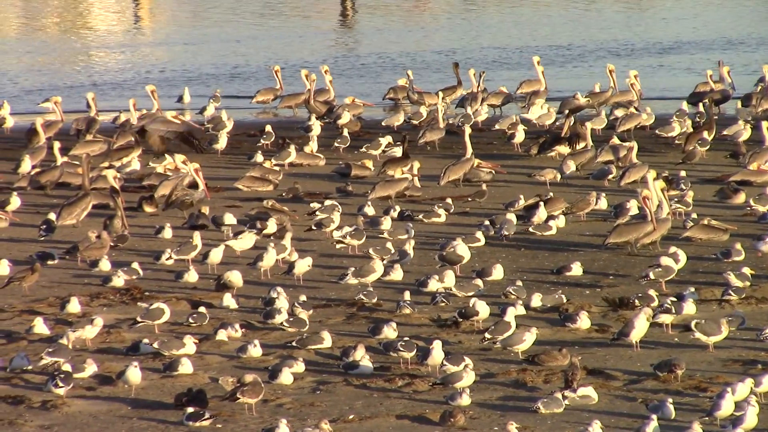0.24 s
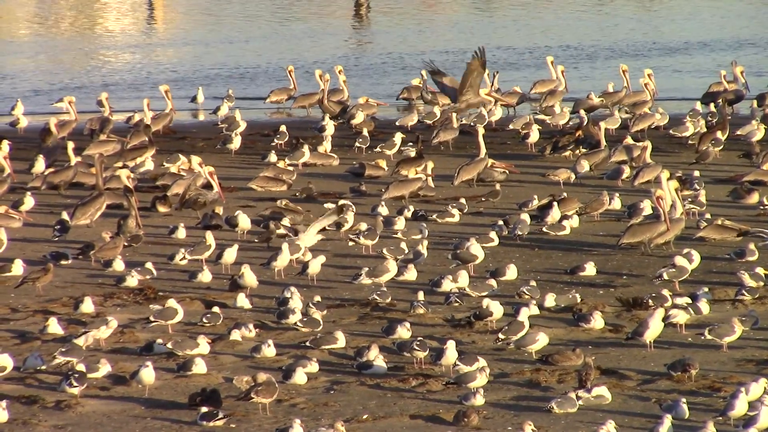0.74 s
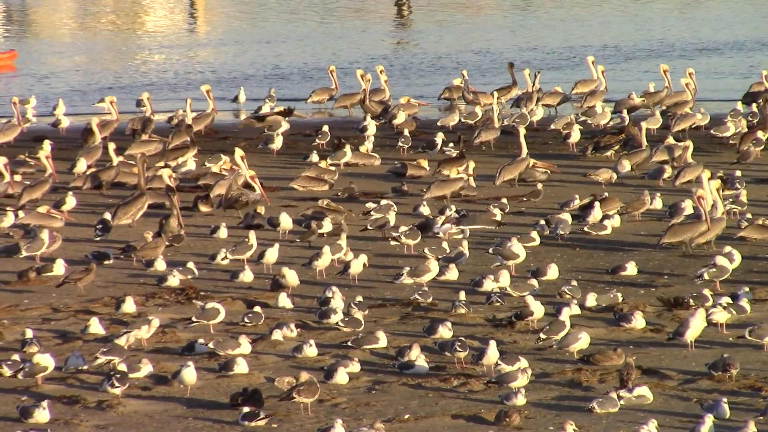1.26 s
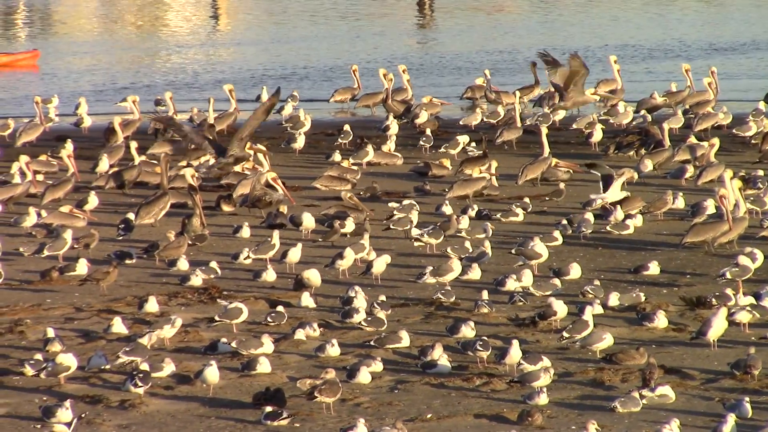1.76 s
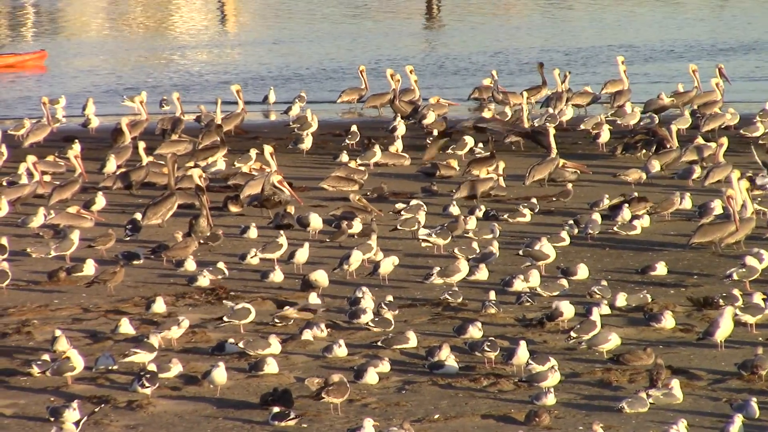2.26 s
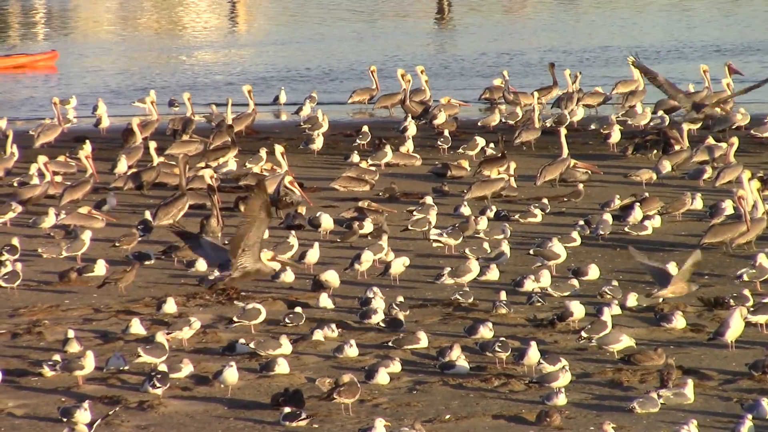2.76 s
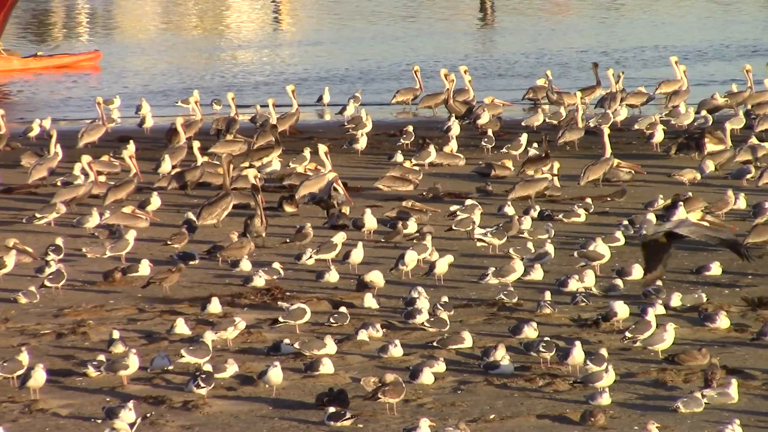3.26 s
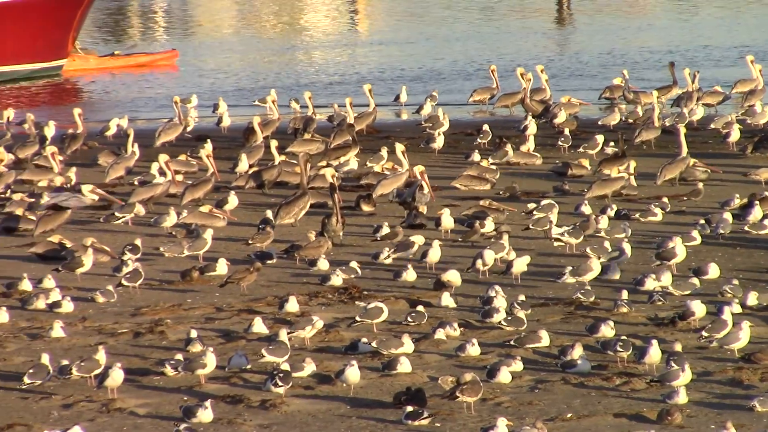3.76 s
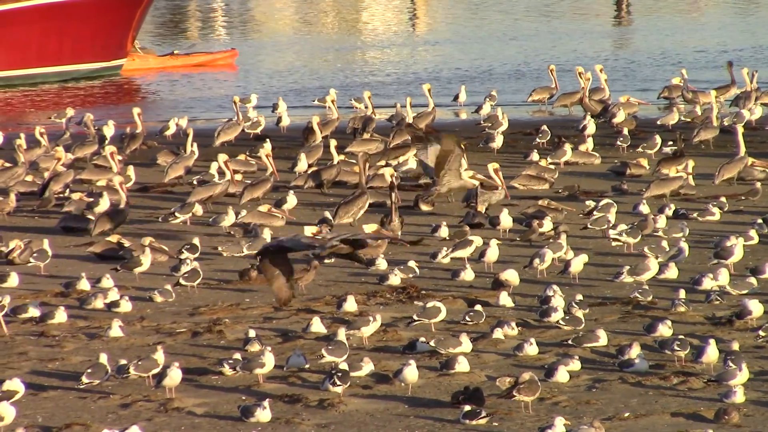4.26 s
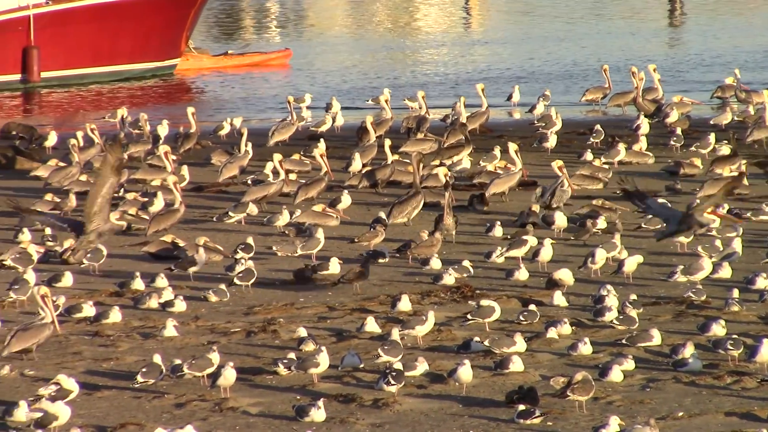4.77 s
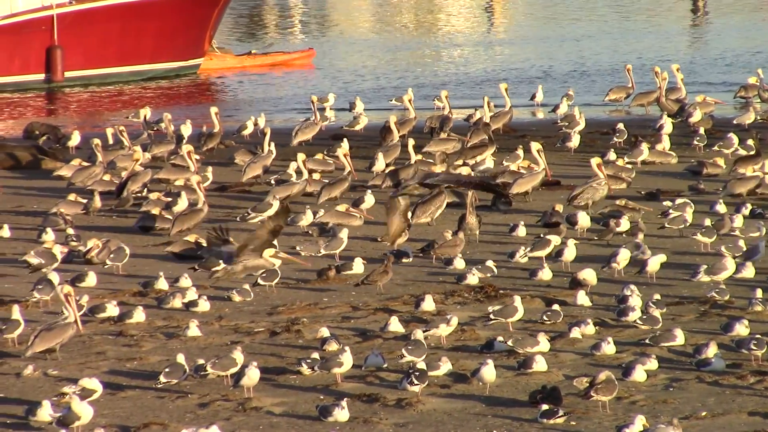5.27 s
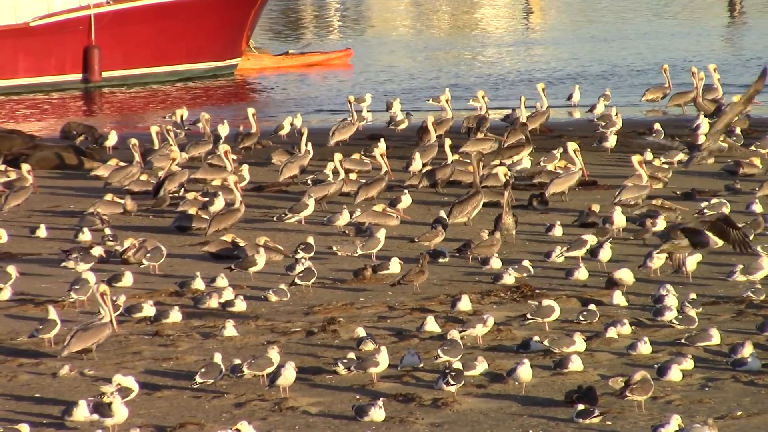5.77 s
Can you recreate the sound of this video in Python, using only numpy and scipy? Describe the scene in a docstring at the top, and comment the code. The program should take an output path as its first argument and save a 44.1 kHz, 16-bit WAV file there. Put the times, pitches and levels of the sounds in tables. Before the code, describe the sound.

Quick, evenly spaced gull cries on a shore, with wind buffeting the microphone and a faint distant roar.

```python
"""One gull repeats its cry over a mudflat: a harmonic voice that climbs, holds and breaks downward,
shaped by throat and beak and roughened by period doubling. Farther gulls and thin whistles answer,
with weak echoes off mud and water. Wind buffets the microphone, its strongest eddies thumping.
Behind them: a wide hiss of shore, a distant roar with a hum in it, small ticks and a thin steady whine."""
import sys
import numpy as np
from scipy import signal
from scipy.io import wavfile
from scipy.ndimage import uniform_filter1d

SR = 44100
rng = np.random.default_rng(int(sys.argv[2]) if len(sys.argv) > 2 else 0)


def pcm_store(signal):
    """Save signal as 16-bit PCM."""
    levels = np.round(np.clip(np.atleast_2d(signal), -1, 1) * 32767)
    wavfile.write(sys.argv[1], SR, levels.astype(np.int16).T)


N = 265437
T = np.arange(N) / SR
CENTRE_FROM_S, CENTRE_BELOW_HZ = 3.375, 2500


def amp(db):
    return 10 ** (np.asarray(db) / 20)


def unit_rms(x):
    return x / np.sqrt(np.mean(x ** 2) + 1e-20)


def at_hz(rows, hz):
    row_hz, value = np.transpose(rows)
    return np.interp(np.log(hz + 1), np.log(row_hz + 1), value)


def gain_curve(rows):
    return amp(np.interp(T, *np.transpose(rows)))


def add(mix, start_s, sound):
    part = mix[round(start_s * SR):][:len(sound)]
    part += sound[:len(part)]


def rounded(x):
    return uniform_filter1d(x, size=220, mode="nearest")


def wander(shape, span):
    """Unit-RMS noise smoothed twice over span samples."""
    return unit_rms(uniform_filter1d(uniform_filter1d(rng.standard_normal(shape), span), span))


def narrow_noise(hz, width_hz):
    """A spectral line whose strength and pitch wander."""
    pole = np.exp(-np.pi * width_hz / SR)
    drift = signal.lfilter([1], [1, -pole], rng.standard_normal((2, N)))
    return unit_rms(drift[0] * np.cos(2 * np.pi * hz * T) + drift[1] * np.sin(2 * np.pi * hz * T))


def stereo_noise(spectrum, coherence, size, patch_db, flicker_db):
    """Unit-RMS noise with drifting patches and flicker; its lower band turns mono at CENTRE_FROM_S."""
    frames, hz = 4 * N // size + 5, np.fft.rfftfreq(size, 1 / SR)
    mid_re, mid_im, side_re, side_im, patches = rng.standard_normal((frames, len(hz), 5)).T
    patches = unit_rms(uniform_filter1d(uniform_filter1d(patches, 9, axis=0), 9, axis=1))
    flicker = np.minimum(unit_rms(uniform_filter1d(rng.standard_normal(frames), 5)), 2)
    frame_s = np.arange(frames) * size / 4 / SR
    width = np.sqrt((1 - np.clip(at_hz(coherence, hz), 0, 1)) / 2)[:, None]
    width = width * ((frame_s < CENTRE_FROM_S) | (hz[:, None] > CENTRE_BELOW_HZ))
    mid = np.sqrt(1 - width ** 2) * (mid_re + 1j * mid_im)
    side = width * (side_re + 1j * side_im)
    gain = amp(at_hz(spectrum, hz)[:, None] + patch_db * patches + flicker_db * flicker)
    spectra = np.array([mid + side, mid - side]) * gain
    return unit_rms(signal.istft(spectra, nperseg=size, noverlap=3 * size // 4)[1][:, :N])


# Shore spectrum. Each row: frequency in Hz, relative density in dB.
SHORE_SPECTRUM = [(24, -56), (40, -44), (171, -2), (526, -11), (845, 2), (1290, -4), (1470, -2.5),
                  (2420, -10), (2810, -11.5), (3260, -17), (3700, -16.5), (5120, -26.5), (10300, -36),
                  (11400, -42.5), (15800, -45.5)]
# Stereo image of shore and roar. Each row: frequency in Hz, left-right coherence 0-1.
DISTANT_COHERENCE = [(60, 0.95), (150, 1.0), (950, 0.99), (2380, 0.96), (5980, 0.87), (15000, 0.9)]
# Dip in shore and whine after the strongest gust. Each row: time in seconds, gain in dB.
BACKGROUND_DIP = [(2.84, 0), (2.9, -5.5), (3., -5.5), (3.36, -4.5), (3.6, 1)]


def shore(level_db=-42.5):
    """Broad, nearly even hiss of the shore."""
    hiss = stereo_noise(SHORE_SPECTRUM, DISTANT_COHERENCE, size=1024, patch_db=1.22, flicker_db=0.38)
    return amp(level_db) * gain_curve(BACKGROUND_DIP) * hiss


def whine(level_db=-74.5):
    """A thin, high band of noise in the centre."""
    return amp(level_db) * gain_curve(BACKGROUND_DIP) * narrow_noise(hz=11050, width_hz=150)


# Roar envelope. Each row: time in seconds, level in dB.
ROAR_LEVEL = [(0.0, -40.5), (1.49, -40), (2.61, -37), (2.98, -44.5), (4.07, -59), (6.02, -44.5)]
# Roar spectrum. Each row: frequency in Hz, relative density in dB.
ROAR_SPECTRUM = [(400, -10), (650, -5.5), (800, 3), (1000, -2.5), (2200, -15.5), (3500, -65)]


def roar(hum_hz=1029, hum_gain_db=-11):
    """Distant midrange noise and a mostly steady hum, swelling and fading together."""
    hum = 0.48 * narrow_noise(hum_hz, width_hz=3) + np.sqrt(2) * np.sin(2 * np.pi * hum_hz * T)
    band = stereo_noise(ROAR_SPECTRUM, DISTANT_COHERENCE, size=1024, patch_db=1, flicker_db=1)
    return gain_curve(ROAR_LEVEL) * (band + amp(hum_gain_db) * hum)


# Ticks. Each row: start in seconds, level in dB, upper band edge in Hz.
MUD_TICKS = [(0.2903, -54, 8700), (0.7267, -54, 8700), (1.276, -52, 11000), (1.4696, -54, 9500),
             (1.7739, -54, 9500), (2.2438, -49, 10000), (2.842, -48.5, 14000), (3.8057, -53, 8850),
             (3.959, -53, 8500), (4.112, -55, 8500), (5.7209, -52.5, 9100)]


def ticks(low_hz=6300, attack_s=0.0005, t60_s=0.011):
    """Short bright snaps, as of drops and bubbles in the mud."""
    out, t = np.zeros(N), np.arange(300) / SR
    for start_s, db, high_hz in MUD_TICKS:
        band = signal.butter(2, [low_hz, high_hz], "bandpass", fs=SR)
        grit = unit_rms(signal.lfilter(*band, rng.standard_normal(len(t))))
        add(out, start_s, amp(db - 60 * t / t60_s) * grit * np.minimum(t / attack_s, 1))
    return out


# Gusts. Each row: time in seconds, strength in dB, rush relative to buffet in dB.
GUSTS = [(0, -45.5, -17), (0.1, -35.5, -6), (0.39, -39.5, -9), (0.44, -56.5, 1), (1.55, -46, -6),
         (1.66, -41.5, -12), (2.25, -44, -9.5), (2.32, -32, -7.5), (2.5, -31, -13), (2.72, -25, -4.5),
         (3.1, -34, -5.5), (3.17, -32, 1), (3.62, -50.5, 6), (3.78, -45.5, 6.5), (3.89, -42, 5.5),
         (3.95, -66, -13), (4.14, -49.5, -0.5), (4.78, -53, 4), (4.87, -48, 4.5), (5.08, -74, 1),
         (5.72, -71, -12), (5.8, -48, -15), (6.02, -42.5, -9)]
# Spectra of the low buffet and the rush above it. Each row: frequency in Hz, relative density in dB.
BUFFET_SPECTRUM = [(30, -21), (60, -16), (100, -17), (150, 9), (210, 10), (300, -3.5), (500, -27),
                   (3000, -130)]
RUSH_SPECTRUM = [(150, -36), (280, 4.5), (400, -3.5), (640, -14), (1000, -17), (1500, -36), (2500, -59),
                 (6000, -130)]
# Wind at the two microphone ports. Each row: frequency in Hz, left-right coherence 0-1.
PORT_COHERENCE = [(60, .999), (150, .985), (290, .7), (640, .4), (1400, .6)]
LEAN_RIGHT = np.outer([-1, 1], T < CENTRE_FROM_S)


def wind(full_width_db=-28):
    """Lumpy turbulence at the ports; weaker wind reaches both more alike."""
    time_s, gust_db, rush_db = np.transpose(GUSTS)
    buffet = stereo_noise(BUFFET_SPECTRUM, PORT_COHERENCE, size=512, patch_db=2, flicker_db=1)
    rush = stereo_noise(RUSH_SPECTRUM, PORT_COHERENCE, size=256, patch_db=2.5, flicker_db=3.6)
    rush *= amp(np.interp(T, time_s, rush_db))
    air = buffet * amp(0.53 * LEAN_RIGHT) + rush * amp(2 * LEAN_RIGHT)
    strength_db = np.interp(T, time_s, gust_db)
    width = amp(np.minimum(strength_db - full_width_db, 0))
    mid = air.mean(0)
    return amp(strength_db) * (mid + width * (air - mid))


# Eddy thumps. Each row: start in seconds, peak before panning in dB, pitch in Hz.
EDDIES = [(0.104, -20.5, 274), (1.68, -25.5, 143), (2.314, -29, 239), (2.49, -20, 149), (2.556, -21.5, 194),
          (2.661, -14.5, 190), (2.684, -18, 199), (2.72, -24, 242), (2.744, -12.5, 210),
          (2.777, -11.5, 216), (2.812, -15.5, 230), (2.884, -26, 212), (2.944, -18, 236), (3.136, -21, 264),
          (3.156, -16, 286), (3.177, -17, 260), (3.229, -22, 277), (3.337, -23, 281), (3.515, -27.5, 300),
          (3.574, -35, 176), (3.674, -28.5, 310), (3.699, -27, 260), (3.81, -26, 325), (3.848, -25.5, 428),
          (3.88, -29, 320), (4.858, -27.5, 302), (5.954, -37, 258)]


def eddies(cycles=3.2, snap_gain_db=-9.5, snap_ratio=2.63):
    """The strongest eddies land as short thumps, each with a higher snap in the middle."""
    thumps, snaps = np.zeros((2, N))
    for start_s, db, hz in EDDIES:
        phase = 2 * np.pi * hz * np.arange(round(cycles * SR / hz)) / SR
        window = np.hanning(len(phase))
        add(thumps, start_s, amp(db) * np.sin(phase) * window)
        add(snaps, start_s, amp(db + snap_gain_db) * np.sin(snap_ratio * phase) * window ** 12)
    return thumps * amp(1.2 * LEAN_RIGHT) + snaps * (0.5 + 0.52 * LEAN_RIGHT)


def mudflat_echoes(sound, t60_s=0.12, gap_s=0.004):
    """Sparse echoes from mud and water, different in each channel."""
    t = np.arange(9000) / SR
    taps = rng.standard_normal((2, len(t))) * (rng.random((2, len(t))) < 0.05)
    taps *= amp(-60 * t / t60_s) * (t > gap_s)
    return signal.fftconvolve(sound[None], taps / np.linalg.norm(taps[0]), axes=1)[:, :N]


# Thin gliding tones, one list per tone. Each row: time in seconds, pitch in Hz, level in dB.
THIN_TONES = [
    [(1.2, 5010, -64), (1.21, 5240, -52), (1.228, 5490, -69.5)],
    [(1.262, 5040, -45), (1.275, 4720, -56.5), (1.35, 4580, -50), (1.42, 4300, -57), (1.468, 4350, -56)],
    [(1.2, 3340, -64), (1.215, 3560, -54), (1.232, 3720, -64)],
    [(4.62, 4050, -62), (4.64, 3700, -52), (4.652, 3400, -62)],
    [(1.48, 4480, -59), (1.502, 4380, -52.5), (1.53, 4500, -53)],
    [(5.054, 3810, -57), (5.066, 3650, -55), (5.082, 3480, -61)],
    [(1.845, 5360, -64), (1.866, 5100, -60.5), (1.88, 4960, -61)],
]


def thin_tones(flutter_db=1.4):
    """Bird whistles and single overtones of far gull cries, as gliding sines."""
    out = np.zeros(N)
    for glide in THIN_TONES:
        time_s, hz, db = np.transpose(glide)
        t = np.arange(time_s[0], time_s[-1], 1 / SR)
        phase = 2 * np.pi * np.cumsum(rounded(np.interp(t, time_s, hz))) / SR
        level_db = rounded(np.interp(t, time_s, db)) + flutter_db * wander(len(t), span=300)
        envelope = amp(level_db) * signal.windows.tukey(len(t), 0.1)
        add(out, time_s[0], envelope * np.sqrt(2) * np.sin(phase))
    return out


# Throat response, beak open and shut. Each row: frequency in Hz, relative gain in dB.
BEAK_OPEN = [(1500, -14.5), (2150, -11), (2600, 2), (3000, 3), (3600, -0.5), (4000, 0.5), (4300, -22),
             (4550, -15.5), (5200, -25), (6000, -34), (6700, -31), (7500, -35), (9000, -42), (10500, -69)]
BEAK_SHUT = [(1050, 6), (1380, 6), (2750, -20.5), (4100, -46), (6900, -48), (8250, -32), (8500, -57),
             (9500, -48), (9900, -24), (11000, -60)]


def gull_voice(hz, doubling, opening, soft_db, veil_db=0):
    """Harmonics through the throat; uneven alternate cycles add partials halfway between them."""
    order = np.arange(1, 15)[:, None] / 2
    partial_db = opening * at_hz(BEAK_OPEN, order * hz) + (1 - opening) * at_hz(BEAK_SHUT, order * hz)
    partial_db -= opening * at_hz(BEAK_OPEN, 2 * hz.max()) + (1 - opening) * at_hz(BEAK_SHUT, hz.max())
    flicker_db = 1.4 * wander(partial_db.shape, span=500)
    partial_db += np.maximum(order - 2, 0) ** 0.5 * (flicker_db - soft_db)  # a softer voice is duller
    partial_db -= np.maximum(order - 3, 0) ** 0.5 * veil_db
    strength = np.where(order % 1, np.clip(doubling, 0, 1), 1) * amp(partial_db)
    phase = 2 * np.pi * order * np.cumsum(hz) / SR + order ** 2
    return np.sqrt(2) * (strength * np.sin(phase)).sum(0)


# Far cries. Each row: apex, rise and fall in seconds, top pitch in Hz, level in dB, hoarseness 0-1.
FAR_CRIES = [(0.549, .05, .057, 1500, -54, 0.14), (2.675, 0.0094, 0.034, 1400, -52, 0.6),
             (4.251, .04, 0.045, 1440, -47.5, .1), (4.541, .035, 0.042, 1590, -52, 0.6),
             (4.587, .07, 0.056, 1460, -44, 0.06), (4.87, .012, .025, 1630, -53, .6),
             (4.926, .033, .03, 1646, -41.5, 0.35), (4.965, .012, .022, 1590, -51, .7),
             (5.006, .015, 0.0604, 1430, -48.5, 0.4), (5.256, .058, 0.036, 1645, -45, 0.25),
             (5.436, .025, .057, 1293, -47, 0.2), (5.557, .04, 0.049, 1680, -49, 0.5),
             (5.876, .01, 0.053, 1700, -49, .45)]


def far_gulls(rise_hz_per_s=3070, fall_hz_per_s=4050):
    """Open-beaked cries, each an arch of pitch; hoarseness shakes pitch and level."""
    out = np.zeros(N)
    for apex_s, rise_s, fall_s, top_hz, db, hoarseness in FAR_CRIES:
        t = np.arange(-rise_s, fall_s, 1 / SR)
        hz = top_hz - np.where(t < 0, rise_hz_per_s / rise_s, fall_hz_per_s / fall_s) * t ** 2
        jitter, shimmer = hoarseness * wander((2, len(t)), span=90)
        tone = gull_voice(hz * (1 + 0.03 * jitter), doubling=0, opening=0.98, soft_db=13)
        swell_db = -9 * ((t - 0.62 * fall_s) / (rise_s + fall_s / 2)) ** 2
        envelope = amp(db + 6.8 * shimmer + swell_db) * signal.windows.tukey(len(t), 0.3)
        add(out, apex_s - rise_s, envelope * tone)
    return out


def ease(x, start, end):
    return np.sin(np.pi / 2 * np.clip((x - start) / (end - start), 0, 1)) ** 2


def cry_shape(lead_s, climb, hold_s, fall_s=0.0237, turn_s=0.01283):
    """Pitch factor, effort in dB and period doubling: a climb, a sagging hold, a break at t = 0."""
    t = np.arange(-hold_s - lead_s, fall_s, 1 / SR)
    lead_left = np.clip((-hold_s - t) / lead_s, 0, 1)
    climb_left = ease(lead_left, 0.1964, 0.77)
    sag = 0.0114 * np.clip(2 + t / hold_s, 0, 2) ** 2 / 2
    drop = 0.39 * np.clip((t + turn_s) / (fall_s + turn_s), 0, 1) ** 1.8
    pitch = 1 - climb * climb_left - drop - sag
    attack_db = -18 * ease(lead_left, 0.46, 1)
    push_db = np.interp(t, [-2 * hold_s, -turn_s], [0, 2])
    release_db = -12 * np.clip(t / fall_s, 0, 1) ** 0.52  # gives way at once, then trails
    doubling = climb_left ** 1.2 + 0.8 * drop  # cycles double while the pitch is low
    return pitch, rounded(attack_db + push_db + release_db), doubling


def rasp(strain, easy_db=-30, strained_db=-8.5, band_hz=(2600, 3800)):
    """The stuttering hoarse puff that opens a cry, louder with strain."""
    band = signal.butter(5, band_hz, "bandpass", fs=SR, output="sos")
    puff = unit_rms(signal.sosfilt(band, rng.standard_normal(1700))) * np.hanning(1700)
    stutter_db = 3.1 * wander(len(puff), span=60)
    return amp(easy_db + (strained_db - easy_db) * strain + stutter_db) * puff


# Near cries. Each row: pitch break in seconds, top pitch in Hz, level in dB, lead-in in seconds,
# climb as a share of the pitch, beak opening 0-1, strain 0-1, dullness in dB.
NEAR_CRIES = [(0.433, 1330, -47, .086, 0.04, 0.03, .0, 1.5), (.938, 1375, -35.5, 0.15, 0.054, 0.12, 0.1, 0),
              (1.308, 1423, -33, 0.12, .06, 0.45, 0.1, -0.5),
              (1.62, 1455, -31.5, 0.082, 0.04, 0.8, 0.1, -1), (1.955, 1513, -32, 0.11, 0.1, 0.91, 0.74, 8),
              (2.311, 1534, -31, 0.12, 0.098, 0.94, 0.82, 1.5),
              (2.666, 1520, -33.5, .131, 0.096, 0.94, 0.94, 2.5),
              (3.034, 1501, -38, .11, 0.076, 0.79, 0.74, .3),
              (3.413, 1502, -38.5, 0.096, 0.082, 0.84, 0.6, 0),
              (3.772, 1504, -38.5, 0.11, 0.088, 0.94, 0.7, 0),
              (4.113, 1500, -40, .095, 0.079, 0.96, 0.6, 2),
              (4.47, 1510, -40.5, 0.097, 0.078, 0.99, 0.45, -1),
              (4.826, 1513, -37.5, 0.1, 0.084, 0.9, 0.3, -1.5),
              (5.175, 1516, -39.5, 0.11, 0.087, 0.98, 0.55, 0),
              (5.521, 1508, -35.5, 0.11, 0.075, 0.79, 0.53, 2.2),
              (5.864, 1502, -36, .113, 0.083, 0.86, 0.4, 4)]


def near_gull(hold_s=0.025, shimmer_db=1.3):
    """Every cry follows one shape: a puff leads into the tone, whose top partials fade in the fall."""
    out = np.zeros(N)
    for break_s, top_hz, db, lead_s, climb, opening, strain, dull_db in NEAR_CRIES:
        start_s = break_s - hold_s - lead_s
        pitch, effort_db, doubling = cry_shape(lead_s, climb, hold_s)
        soft_db = -0.6 * effort_db + 2.3 * doubling
        veil_db = dull_db + 58 * np.maximum(1 - climb - pitch, 0)
        tone = gull_voice(top_hz * pitch, strain * doubling, opening, soft_db, veil_db)
        level_db = db + effort_db + shimmer_db * wander(len(tone), span=45)
        add(out, start_s, amp(level_db) * tone * signal.windows.tukey(len(tone), 0.1))
        add(out, start_s + 0.0026, amp(db) * rasp(strain))
    return out


def scene():
    """Near gull in the centre, farther birds slightly left, over wind and background."""
    near = near_gull()
    far = far_gulls() + thin_tones()
    birds = near + far * amp([[1.3], [-1.3]]) + mudflat_echoes(amp(-28.5) * near + amp(-15) * far)
    return birds + wind() + eddies() + ticks() + shore() + roar() + whine()


def record(dry):
    """Closely spaced ports get deep sound alike; a steep bass cut and a band limit follow."""
    mono_below_hz, bass_cut_hz, band_limit_hz = 153, 75, 15750
    side_cut = signal.butter(2, mono_below_hz, "highpass", fs=SR, output="sos")
    bass_cut = signal.butter(3, bass_cut_hz, "highpass", fs=SR, output="sos")
    band_limit = signal.firwin(1023, band_limit_hz, window=("kaiser", 11), fs=SR)
    side = signal.sosfiltfilt(side_cut, (dry[0] - dry[1]) / 2)
    ports = dry.mean(0) + np.array([side, -side])
    return signal.oaconvolve(signal.sosfilt(bass_cut, ports), band_limit[None], "same")


dry = scene()
out = record(dry)
pcm_store(out)
```